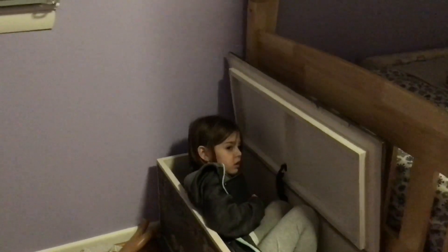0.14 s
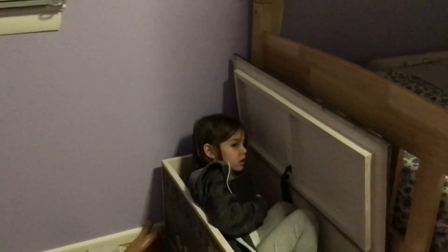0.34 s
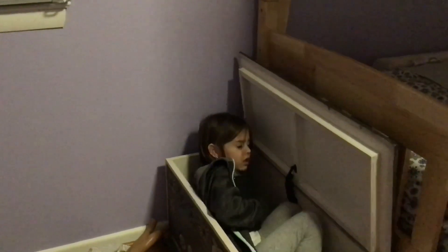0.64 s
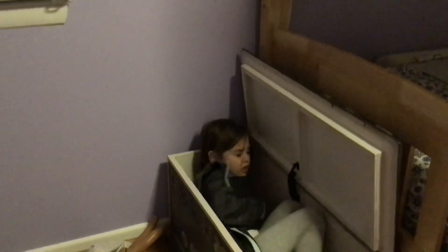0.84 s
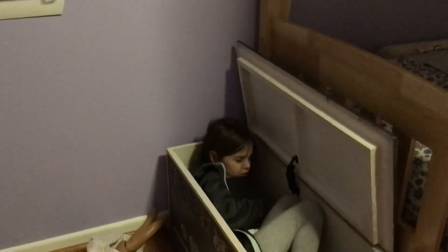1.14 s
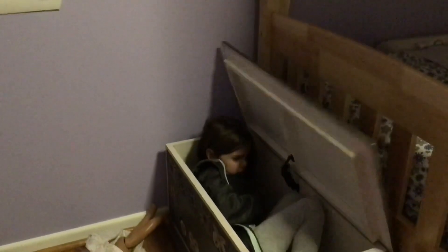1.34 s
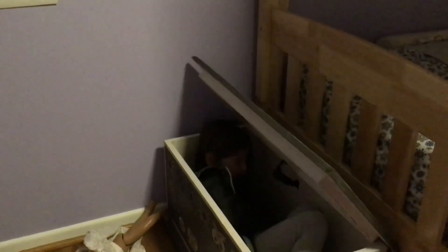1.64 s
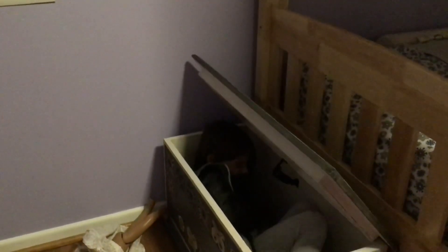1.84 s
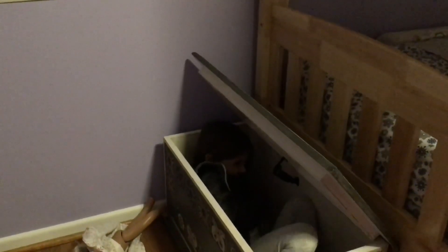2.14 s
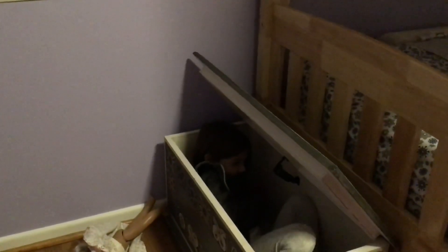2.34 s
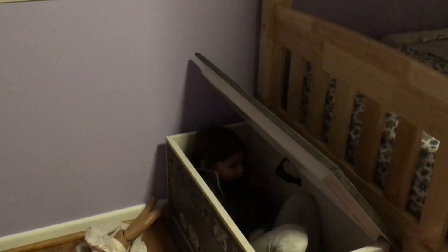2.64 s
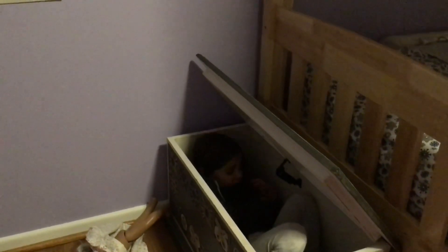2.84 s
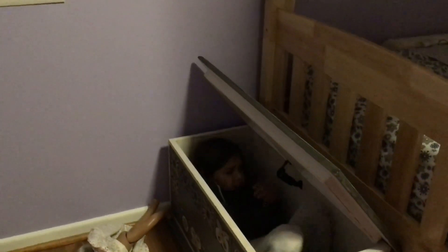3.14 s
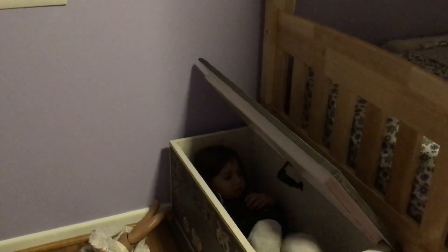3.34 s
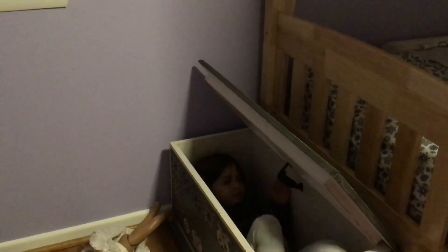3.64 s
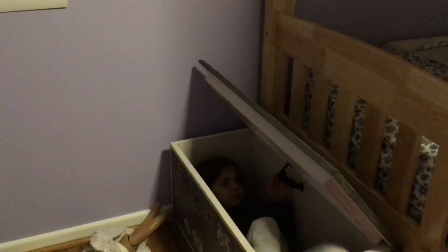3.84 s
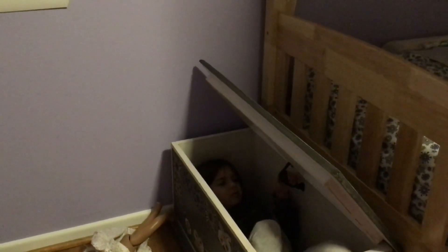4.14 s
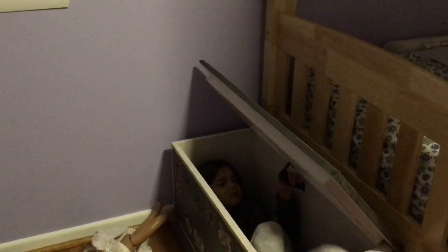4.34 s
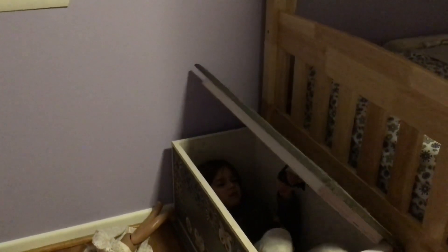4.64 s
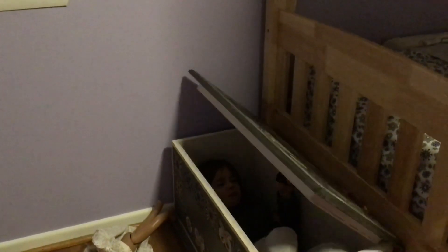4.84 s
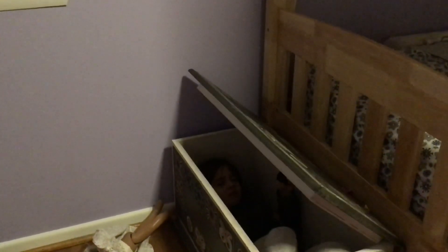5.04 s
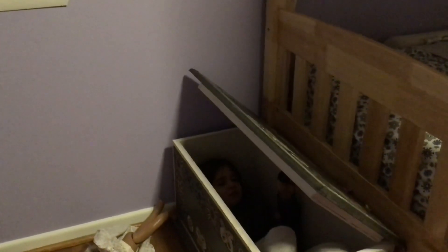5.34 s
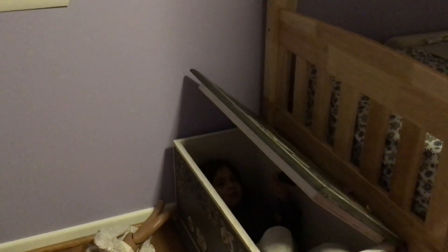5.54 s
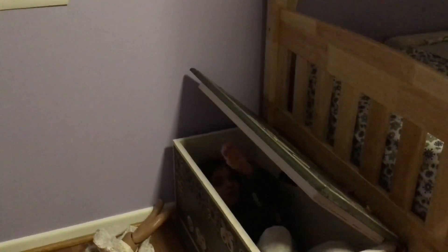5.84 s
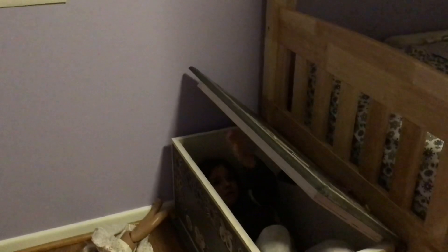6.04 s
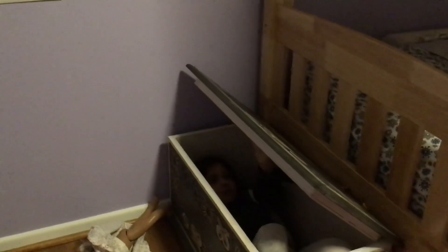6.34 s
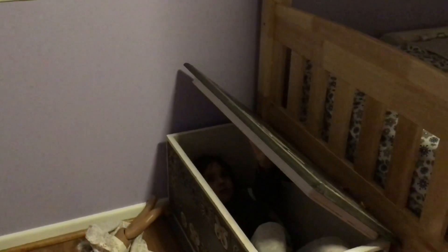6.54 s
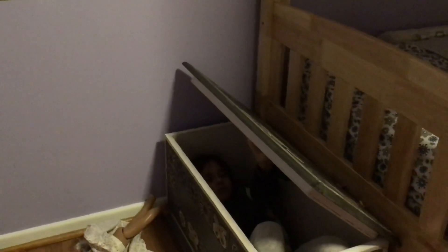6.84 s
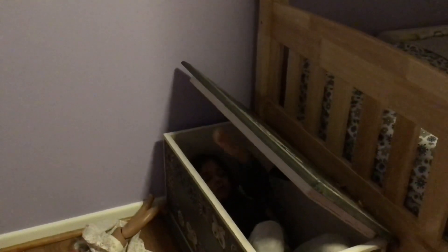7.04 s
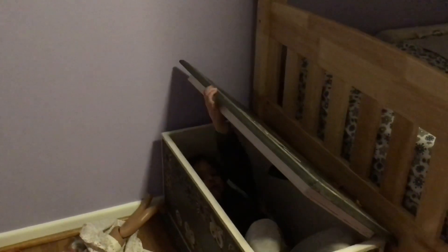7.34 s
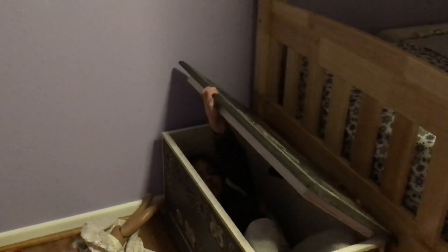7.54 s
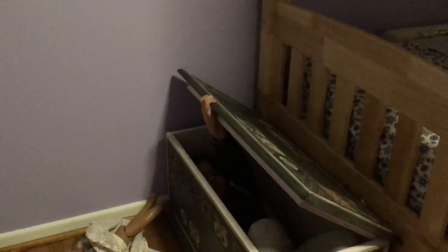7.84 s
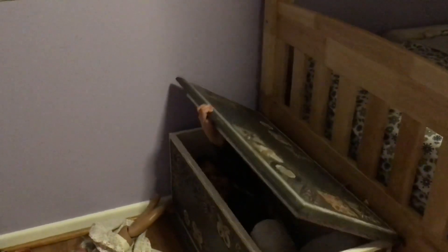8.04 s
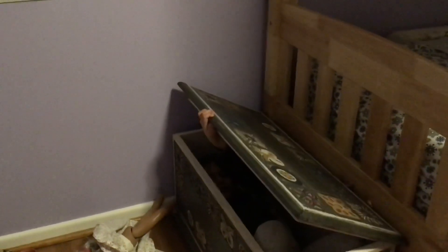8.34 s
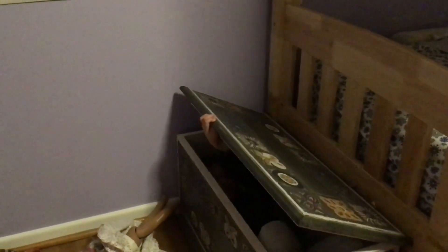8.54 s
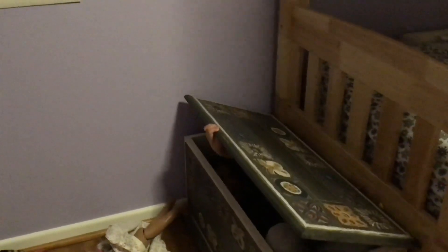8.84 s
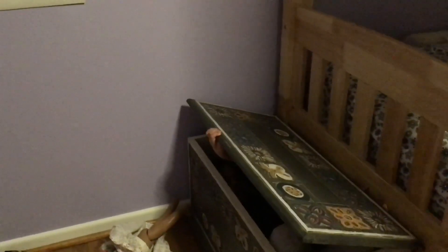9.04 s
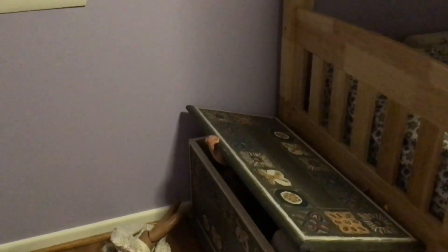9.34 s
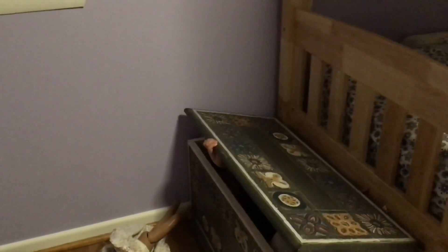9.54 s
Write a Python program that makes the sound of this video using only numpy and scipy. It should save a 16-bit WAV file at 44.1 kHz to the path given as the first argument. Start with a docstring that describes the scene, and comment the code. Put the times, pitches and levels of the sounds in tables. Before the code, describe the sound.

Clothes rustle and limbs scrape inside a wooden chest, its lid stay snaps and ticks, then the lid bangs shut in a small bedroom.

```python
"""Clothes rustle and limbs drag as someone shifts about inside a wooden chest in a small bedroom.
Cloth is coloured grit; drags are stick-slip noise through panel modes, over a steady hush.
The stiff lid stay snaps, knees bump and the lid is pulled down in steps to a bang: noise bursts
excite lid and box, tones give the padded bumps and deep heaves. Echoes and decaying taps make the room."""
import sys
import numpy as np
from scipy import signal
from scipy.fft import rfft, irfft
from scipy.io import wavfile
from scipy.ndimage import uniform_filter1d, minimum_filter1d

SR = 44100
rng = np.random.default_rng(int(sys.argv[2]) if len(sys.argv) > 2 else 0)


def master_out(mix):
    """Clip the mix to full scale and print it as 16-bit PCM to the path in sys.argv[1]."""
    frames = np.transpose(np.atleast_2d(mix))
    ceiling = np.clip(frames, -1, 1)
    pcm = np.round(ceiling * 32767).astype(np.int16)
    wavfile.write(sys.argv[1], SR, pcm)


N = 428211

# modes of the chest's panels and air: mode_hz, width_hz, gain_db
BOX_MODES = [(129.8, 9.3, 5), (164.6, 29, 6.5), (199, 26, 4.5), (265.4, 7.8, -28.5), (344, 140, -4),
             (428.5, 37, -1.5), (525, 145, -13), (626, 110, -6.5), (771, 160, -4), (937, 38, -12),
             (1023, 150, -27.5), (1183, 114, -11.5)]


def amp(db):
    """Decibels to amplitude ratio."""
    return 10 ** (np.asarray(db) / 20)


def evened(x):
    """Scales to unit RMS."""
    return x / np.sqrt(np.mean(x ** 2) + 1e-20)


def read(points, hz):
    """Interpolates a (Hz, value) curve over log frequency."""
    point_hz, value = np.transpose(points)
    return np.interp(np.log(hz + 1), np.log(point_hz + 1), value)


def add(mix, start_s, sound):
    """Adds a sound in place, cut at the end of the mix."""
    part = mix[round(start_s * SR):][:len(sound)]
    part += sound[:len(part)]


def colour(x, points):
    """Causal filter with the given spectrum (minimum phase by the cepstrum)."""
    gain_db = np.maximum(read(points, np.fft.rfftfreq(4096, 1 / SR)), -100)
    cepstrum = irfft(gain_db * np.log(10) / 20)
    # fold negative time onto positive time
    cepstrum[1:2048] *= 2
    cepstrum[2049:] = 0
    impulse = irfft(np.exp(rfft(cepstrum)))[:2048]
    return signal.oaconvolve(x, impulse)[:len(x)]


def whiten(x):
    """Evens the broad spectrum, as a crowd of splinters favours no band; silences the second half."""
    spectrum = rfft(x)
    power = uniform_filter1d(abs(spectrum) ** 2, size=25)
    flat = irfft(spectrum * np.sqrt(power.mean() / power), len(x))
    return flat * (np.arange(len(x)) < len(x) // 2)


def ring(x, modes):
    """Drives each mode of a body as a two-pole resonance."""
    out = np.zeros(len(x))
    for mode_hz, width_hz, gain_db in modes:
        r = np.exp(-np.pi * width_hz / SR)
        poles = [1, -2 * r * np.cos(2 * np.pi * mode_hz / SR), r * r]
        out += amp(gain_db) * (1 - r) * signal.lfilter([1, 0, -1], poles, x)
    return out


def glide(x, rows, width_hz):
    """A resonance that follows the last column: shift down to zero, smooth, shift back."""
    s, hz = np.vstack(rows)[:, [0, -1]].T
    path_hz = np.interp(np.arange(N) / SR, s, hz)
    turn = np.exp(2j * np.pi * np.cumsum(path_hz) / SR)
    r = np.exp(-np.pi * width_hz / SR)
    return 2 * (turn * signal.lfilter([1 - r], [1, -r], x / turn)).real


def dull(x, cutoff_hz):
    """Soft contact passes little treble: second-order low-pass."""
    return signal.sosfilt(signal.butter(2, cutoff_hz, fs=SR, output="sos"), x)


def grit(per_s, spread_db, smooth):
    """Stick-slip drive: uneven small slips over a smooth noise."""
    size = amp(spread_db * np.minimum(rng.exponential(1, N), 4))
    slips = size * (rng.random(N) < per_s / SR)
    return evened(slips * rng.standard_normal(N)) + smooth * rng.standard_normal(N)


def strokes(rows, axis):
    """Gain of strokes (peak_s, rise_s, fall_s, ...) summed in power; column `axis` sets their dB."""
    swell_db = 20  # drop one rise before the peak and one fall after it, ahead of smoothing
    power = np.zeros(N)
    for row in rows:
        peak_s, rise_s, fall_s = row[0], row[1], row[2]
        t = np.arange(-3 * rise_s, 3 * fall_s, 1 / SR)
        drop_db = swell_db * np.where(t < 0, -t / rise_s, t / fall_s)
        gain = amp(row[axis] - drop_db)[t + peak_s >= 0]
        add(power, max(peak_s + t[0], 0), gain ** 2)
    return np.sqrt(abs(uniform_filter1d(power, size=300)))


def hush():
    """Steady room air and microphone hiss: shaped noise with slight patches in time and pitch."""
    # hush spectrum: hz, relative_db_per_hz
    hush_curve = [(15, -52), (25, -10), (102, 5), (199, -2), (283, -7), (513, -13), (811, -13.5),
                  (1030, -20), (2520, -17.5), (3040, -21.5), (3770, -18.5), (5810, -29), (14100, -36),
                  (15800, -58)]
    rms_db, patch_db = -61, 1.5
    frames, hz = N // 256 + 5, np.fft.rfftfreq(1024, 1 / SR)
    real, imag, patches = rng.standard_normal((frames, 513, 3)).T
    patches = uniform_filter1d(patches, size=12, axis=0)
    patches = evened(uniform_filter1d(patches, size=14, axis=1))
    spectra = (real + 1j * imag) * amp(read(hush_curve, hz)[:, None] + patch_db * patches)
    noise = signal.istft(spectra, nperseg=1024, noverlap=768)[1][:N]
    return amp(rms_db) * evened(noise)


def cloth():
    """Slides of clothing: fine fibres catch as coloured grit; some slides shine brighter."""
    # slides: peak_s, rise_s, fall_s, relative_level_db, sheen_db (treble, re level)
    slide_rows = [(0, .01, 0.041, -55, -23), (.098, 0.0073, 0.051, -54, -4), (.2, 0.15, 0.073, -61, -12),
                  (.478, 0.38, 0.076, -52, -27), (.7, 0.17, 0.079, -48.5, -33),
                  (0.931, 0.051, 0.03, -32, -7), (1.08, 0.071, 0.027, -55, -12),
                  (1.3, 0.29, 0.31, -57.5, -16), (1.43, 0.049, .02, -46, 10), (1.5, 0.037, 0.12, -39, 2),
                  (1.622, 0.17, 0.022, -28.5, -2), (1.72, .01, .04, -53, -5),
                  (2.08, 0.12, 0.08, -33.5, 2.5), (2.219, 0.11, 0.011, -39.5, 3.5),
                  (2.5, .3, 0.38, -67, -18), (2.79, 0.8, 0.15, -49, -20), (3.02, .04, 0.1, -54, -20),
                  (3.2, 0.39, 0.23, -49.5, -13), (3.34, 0.057, 0.0068, -35, 1.5),
                  (3.45, 0.11, .03, -52, -18), (3.66, .05, 0.98, -58.5, -19),
                  (3.87, 0.012, 0.017, -69.5, 16), (3.99, 0.45, .03, -61, -2), (4.7, 0.11, 0.52, -55.5, 4),
                  (4.83, 0.13, 0.022, -66, 11), (6.17, .02, .2, -65, -6), (6.266, 0.021, .015, -64, -4),
                  (6.6, 0.088, 0.089, -60.5, 2), (6.748, .015, .03, -51.5, -3),
                  (6.816, 0.12, 0.064, -55, 4), (6.958, 0.017, .04, -61, 2), (7.15, 0.56, 0.61, -62.5, -2),
                  (7.33, 0.085, 0.14, -50.5, -12), (7.96, 0.32, 0.22, -51.5, 3),
                  (8.49, 0.12, 0.092, -62, 1), (8.639, 0.042, .2, -42.5, -21)]
    # fibre spectrum: hz, relative_db_per_hz
    rustle_curve = [(710, -36.5), (1200, -8), (1660, -6), (1950, -1.5), (2170, -4), (2390, -2.5),
                    (3130, -7.5), (3800, -3), (5420, -17.5), (6110, -26.5), (10800, -37.5), (15800, -60.5)]
    fibres = evened(colour(grit(3000, 3, .8), rustle_curve))
    sheen = signal.sosfilt(signal.butter(4, 5500, "high", fs=SR, output="sos"), fibres)
    shine_rows = [(s, rise, fall, db + sheen_db) for s, rise, fall, db, sheen_db in slide_rows]
    level = strokes(slide_rows, axis=3)
    return level * fibres + (strokes(shine_rows, axis=3) - level) * sheen


def drags():
    """Limb weight shakes the deep box modes; scraping shakes its boards, most the one under the limb."""
    # drags of a limb: peak_s, rise_s, fall_s, weight_db, scrape_db (both relative), board_hz
    drag_rows = [(.1, .02, 0.18, -51.5, -58, 498), (.284, 0.021, 0.13, -48.5, -50.5, 423),
                 (.424, 0.17, 0.16, -65, -46.5, 715), (.664, 0.085, 0.057, -67, -41.5, 486),
                 (.74, 0.056, 0.025, -45, -36.5, 696), (.92, 0.048, 0.047, -20.5, -38, 560),
                 (1.01, 0.046, 0.15, -39, -45.5, 405), (1.24, 0.04, 0.043, -49, -52, 357),
                 (1.39, 0.079, 0.075, -49, -54, 612), (1.5, 0.073, 0.055, -30, -26.5, 412),
                 (1.6, 0.1, 0.034, -43, -18, 492), (1.73, 0.014, 0.017, -37, -31, 450),
                 (2.01, 0.054, 0.039, -50, -35.5, 543), (2.06, 0.021, 0.2, -33.5, -41, 334),
                 (2.16, 0.24, .06, -46, -33, 564), (2.23, 0.13, 0.015, -38, -24.5, 456),
                 (2.45, 0.085, 0.16, -56, -50.5, 340), (2.81, 0.051, 0.094, -43.5, -47, 380),
                 (3.06, 0.063, 0.3, -67, -50.5, 500), (3.17, 0.038, .03, -35.5, -48, 372),
                 (3.24, 0.025, 0.12, -42, -37, 351), (3.34, 0.095, 0.027, -48, -23.5, 460),
                 (3.47, 0.01, 0.12, -34, -27, 435), (3.59, 0.05, 0.079, -34.5, -39.5, 461),
                 (3.78, 0.085, 0.08, -56, -48, 574), (4.04, 0.21, 0.069, -58, -55, 611),
                 (4.22, .03, .1, -54, -47, 400), (4.3, .05, .06, -48, -50, 610),
                 (4.53, 0.086, 0.033, -42, -62, 800), (4.61, 0.05, 0.06, -46, -51, 450),
                 (4.74, 0.26, 0.11, -45.5, -49, 544), (4.88, .04, 0.049, -55, -58, 563),
                 (5.22, 0.11, 0.081, -42, -53, 890), (5.36, 0.13, 0.39, -67, -55.5, 740),
                 (5.64, .07, .1, -57, -60, 450), (6.18, 0.06, 0.16, -54.5, -53.5, 446),
                 (6.86, 0.45, 0.06, -55.5, -61, 359), (7.06, .08, 0.24, -71, -57.5, 466),
                 (7.43, 0.15, 0.043, -44, -54, 428), (7.63, 0.14, 0.039, -47, -50.5, 601),
                 (7.72, .06, .04, -53, -68, 365), (7.83, 0.081, 0.066, -40.5, -48, 943),
                 (7.93, 0.076, 0.25, -42.5, -52, 920), (8.13, 0.26, 0.037, -46, -46.5, 444),
                 (8.25, 0.04, 0.053, -41.5, -74, 590), (8.46, 0.14, 0.089, -38.5, -39.5, 837),
                 (8.53, 0.06, 0.029, -40.5, -54, 410), (8.7, 0.083, 0.075, -32, -27, 454),
                 (8.86, .1, 0.19, -42.5, -50, 451), (9.15, 0.028, .1, -69.5, -56, 702),
                 (9.34, 0.14, 0.077, -44, -52.5, 597), (9.5, 0.045, .05, -61, -56, 605)]
    # constant small shifting, interpolated: time_s, weight_db, scrape_db (both relative)
    stir_rows = [(0.0, -68, -67), (0.86, -59, -56.5), (1.38, -71, -62), (1.62, -27.5, -45),
                 (1.76, -44.5, -68), (2.0, -69, -70), (2.14, -44, -52), (2.49, -53.5, -49.5),
                 (3.08, -62.5, -63.5), (3.43, -47, -51), (3.76, -54, -70), (4.27, -78, -49),
                 (4.68, -51, -81), (4.92, -64.5, -66), (6.52, -66, -71), (8.63, -50.5, -62.5),
                 (8.95, -56.5, -67), (9.71, -59.5, -66)]
    deep = evened(dull(ring(grit(150, 3.0, 0.77), BOX_MODES[:4]), 200))
    boards = evened(dull(ring(grit(400, 2.2, 0.67), BOX_MODES[4:]), 2300))
    boards = evened(boards + amp(6) * glide(boards, drag_rows, 170))
    s, *stir_db = np.transpose(stir_rows)
    stir_weight, stir_scrape = (amp(np.interp(np.arange(N) / SR, s, db)) for db in stir_db)
    weight_gain = np.hypot(stir_weight, strokes(drag_rows, axis=3))
    scrape_gain = np.hypot(stir_scrape, strokes(drag_rows, axis=4))
    return weight_gain * deep, scrape_gain * boards


def snaps():
    """Splintery noise as the joint slips, a hard tick as it catches; the box swells more slowly below."""
    # snaps and taps: time_s, crack_db, thud_db (both relative), ring_hz, decay_s, tilt_db_per_octave
    snap_rows = [(.092, -39, -56.5, 3750, 0.0047, 2.5), (.848, -19, -15.5, 1710, 0.0021, 2),
                 (0.894, -23.5, -21, 1130, .009, 12), (1.42, -26.5, -44, 1040, 0.0071, 0),
                 (1.716, -32.5, -20, 880, 0.0045, 9.5), (1.839, -46, -57, 4120, .004, 2),
                 (1.933, -30, -43, 3850, .0046, 2), (2.247, -27.5, -21, 2294, 0.0026, -3),
                 (3.467, -11.5, -7.5, 2560, 0.0014, 8.5), (3.589, -28, -21, 970, 0.0018, -5.5),
                 (4.022, -40, -47, 2000, .012, -1), (4.27, -39, -55, 2300, .003, 0),
                 (4.436, -16, -25.5, 2360, 0.006, 4.5), (4.464, -21.5, -34, 2400, 0.0081, 4),
                 (4.489, -23.5, -43, 1180, 0.01, 2.5), (4.529, -23.5, -43, 1190, 0.0031, 2),
                 (5.034, -27.5, -35.5, 2420, 0.0016, 0.5), (5.142, -16, -31.5, 3750, 0.0076, 3.5),
                 (5.194, -20, -36, 2100, 0.0024, 3), (5.577, -43, -74, 1050, .004, -7),
                 (5.925, -49, -62, 700, .004, -13), (6.152, -46, -52, 2270, .004, 8),
                 (6.259, -46, -46, 1150, .0028, 7), (6.671, -41, -63, 1570, 0.004, -2),
                 (6.747, -38.5, -60, 1760, 0.0045, -2.5), (6.96, -42, -39, 918, 0.0023, 0),
                 (7.306, -44, -34.5, 1130, 0.0048, -1), (7.336, -18, -22.5, 2430, 0.01, 2.5),
                 (7.546, -19.5, -51, 2370, 0.0069, 2.5), (7.784, -21.5, -59, 2000, 0.0052, 1.5),
                 (7.811, -18, -50, 2270, 0.0091, 3.5), (7.911, -17, -57, 2200, .0046, 3.5),
                 (7.935, -20.5, -61, 1970, 0.013, .6), (8.199, -31.5, -35, 1560, 0.0025, -5),
                 (8.211, -23, -28.5, 1226, 0.0097, -1.7), (8.361, -27, -74, 956, 0.002, 0),
                 (8.402, -21, -44, 1930, 0.018, 2.5), (8.435, -23.5, -46, 980, 0.026, .6),
                 (8.491, -30, -57, 1430, 0.0047, -2), (8.625, 0.5, 1.5, 1900, 0.0024, 3),
                 (9.068, -45, -50, 1233, 0.0031, -0.5), (9.137, -34.5, -44.5, 1190, 0.0016, 1.5),
                 (9.168, -45.5, -42.5, 2600, 0.005, 1.5), (9.247, -51, -58, 4400, .003, 7.5)]
    # lid and stay modes: mode_hz, width_hz, gain_db
    lid_modes = [(994, 110, 8), (1850, 40, 11), (2110, 360, 10.5), (2408, 100, 12), (3260, 200, 3),
                 (3750, 290, 7), (4150, 160, 8), (4760, 280, 6.5), (4970, 620, 2.5)]
    # crack spectrum: hz, relative_db_per_hz
    crack_curve = [(180, -44), (300, -28.5), (354, -1.5), (665, -1), (747, -2.5), (941, -2.5), (1500, -4),
                   (1980, -7), (2860, -7.5), (3790, -8), (5930, -25), (15800, -51)]
    slip_s, hurry = .0075, 0.41  # longest slip; harder blows catch sooner
    tick_db, crest_db = 5.5, 9.5  # tick level; allowance for peak over mean of the crack
    blunt_db = 9  # loss per octave above 5 kHz at crack_db 0: hard blows squash the contact
    spot_db = 6  # spread of lid mode gains: each snap strikes another spot
    cracks, thuds, t = np.zeros(N), np.zeros(N), np.arange(4400) / SR
    noises = rng.standard_normal((len(snap_rows), len(t)))
    spots = rng.standard_normal((len(snap_rows), len(lid_modes)))
    for (s, db, thud_db, ring_hz, decay_s, tilt), noise, spot in zip(snap_rows, noises, spots):
        lid = [(f, width, d + spot_db * u) for (f, width, d), u in zip(lid_modes, spot)]
        catch_s = slip_s / (1 + hurry * amp(db))
        burst = noise * np.exp(-np.maximum(t - catch_s, 0) / np.clip(decay_s, .001, .04))
        tick = amp(tick_db) * np.exp(-((t - catch_s) / .0006) ** 2) * np.sign(noise)
        tilted = []
        for f, d in crack_curve:
            slope_db = tilt * np.log2(min(f, 9000) / 2000)
            loss_db = blunt_db * amp(db) * max(np.log2(f / 5000), 0)
            tilted.append((f, d + slope_db - loss_db))
        crack = colour(whiten(burst * np.minimum(t / 0.00033, 1) + tick), tilted)
        crack = crack + amp(-7) * ring(crack, lid) + amp(1.5) * ring(crack, [(ring_hz, 250, 0)])
        thud = dull(ring(whiten(burst * np.minimum(t / 0.016, 1)), BOX_MODES), 1000)
        thud = thud * np.cos(np.pi / 2 * t / t[-1])
        add(cracks, s - .001, amp(db - crest_db) * crack / np.sqrt(np.mean(crack[:500] ** 2)))
        add(thuds, s, amp(thud_db - 4) * thud / abs(thud).max())
    return thuds, cracks


def bumps():
    """Padded blows of knees and elbows: no crack, one panel swells up and dies, the other modes stir."""
    # bumps: time_s, relative_level_db, pitch_hz, t60_s (clipped below)
    bump_rows = [(0.641, -44.5, 535, 0.12), (0.729, -30, 786, 0.14), (0.862, -13, 170.4, 0.094),
                 (0.904, -17, 180, 0.13), (0.925, -12.5, 140, 0.12), (0.958, -32, 136, 0.05),
                 (1.234, -40, 303, 0.042), (1.585, -23.5, 900, 0.09), (2.53, -40.5, 296, 0.19),
                 (1.231, -34, 165, 0.054), (1.489, -25, 154, 0.17), (1.592, -15, 192, 0.091),
                 (1.725, -22, 183, 0.032), (1.945, -33.5, 190, 0.18), (1.993, -30.5, 197, 0.16),
                 (2.045, -18.5, 210, 0.072), (2.212, -19, 448, 0.12), (2.431, -40, 246, 0.24),
                 (2.793, -28.5, 170, 0.052), (3.164, -24.5, 187, 0.086), (3.236, -32, 237, 0.15),
                 (3.336, -19, 213, 0.089), (3.484, -37, 179, 0.35), (4.208, -31, 190, 0.069),
                 (4.76, -35.5, 160, 0.36), (6.968, -50.5, 201, 0.65), (7.661, -31.5, 174, 0.14),
                 (7.701, -34, 153, 0.096), (7.726, -36.5, 181, 0.11), (8.032, -26.5, 160.4, 0.16),
                 (8.061, -34, 166, 0.16), (8.085, -29, 164, 0.12), (8.631, -7.5, 199, 0.096),
                 (9.501, -53, 201, 0.12)]
    out, t = np.zeros(N), np.arange(9000) / SR
    noises = rng.standard_normal((len(bump_rows), len(t)))
    for (s, db, hz, t60_s), noise in zip(bump_rows, noises):
        decay = amp(-60 * t / np.clip(t60_s, .03, .3))
        swell = np.sin(np.pi / 2 * np.minimum(t / 0.0077, 1)) ** 2
        panel = np.sin(2 * np.pi * hz * t) + 0.3 * evened(ring(noise, BOX_MODES))
        add(out, s - .006, amp(db + 2.5) * decay * swell * panel)
    return dull(out, 727)


def heaves():
    """Slow heaves of the whole chest on the floor: a few deep cycles that swell and fade."""
    # heaves: start_s, peak_db, pitch_hz, length_s
    heave_rows = [(0.928, -39, 63, 0.16), (1.544, -58, 70, .2), (8.624, -40, 84, .15)]
    out = np.zeros(N)
    for s, db, hz, length_s in heave_rows:
        t = np.arange(round(length_s * SR)) / SR
        add(out, s, amp(db) * np.sin(2 * np.pi * hz * t) * np.hanning(len(t)))
    return out


def bedroom(x):
    """Early echoes, then three tails of sparse taps, each band dying at its own speed; they trade shares."""
    # reverberation: hz, t60_s
    room_curve = [(100, 0.18), (400, 0.31), (1500, 0.32), (4000, 0.31), (8000, 0.34), (14000, 0.023)]
    # wall, bed and floor: delay_s, gain_db
    echo_rows = [(.0035, -8.5), (0.014, -9.5), (.021, -21.5)]
    out, turn = np.zeros(N), 2 * np.pi * np.arange(N) / SR / 1.1  # one cycle of shares per 1.1 s
    slots = np.arange(200, SR // 2 - 20, 20)
    for k in range(3):
        taps = np.zeros(SR // 2)
        taps[slots + rng.integers(0, 20, len(slots))] = rng.choice([-1., 1.], len(slots))
        hz, t, bands = signal.stft(taps, SR, nperseg=256)
        decay = amp(-60 * t / read(room_curve, hz)[:, None])
        tail = signal.istft(bands * decay, SR, nperseg=256)[1]
        share = np.sqrt((1 + np.cos(turn + 2 * np.pi * k / 3)) / 3)
        out += signal.oaconvolve(x * share, amp(-6.5) * tail / np.linalg.norm(tail))[:N]
    for delay_s, db in echo_rows:
        add(out, delay_s, amp(db) * x)
    return out


def scene():
    """Sums the direct sounds, their room sound and the hush."""
    (weight, boards), (thuds, cracks) = drags(), snaps()
    # the box is too small to send out much below its lowest mode
    deep = signal.sosfilt(signal.butter(3, 105, "high", fs=SR, output="sos"), weight + thuds + bumps())
    bright = amp(-4.5) * (boards + cracks + cloth())
    # the long bass waves stir the room less than they ring in the box
    room = bedroom(bright + amp(-3) * deep)
    return (deep + heaves() + bright + room + hush())[None]


def record(dry):
    """A quick limiter holds the loudest peaks, the small microphone drops the deepest bass; then a band limit."""
    ceiling, edge_hz = .85, 15800
    gain = minimum_filter1d(ceiling / np.maximum(abs(dry), ceiling), size=200)
    held = dry * uniform_filter1d(uniform_filter1d(gain, size=100), size=100)
    thin = signal.sosfilt(signal.butter(4, 47, "high", fs=SR, output="sos"), held)
    band = signal.firwin(511, edge_hz, window=("kaiser", 9), fs=SR)
    return signal.oaconvolve(thin, band[None], "same")


dry = scene()
out = record(dry)
master_out(out)
```